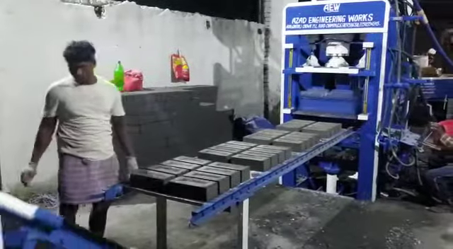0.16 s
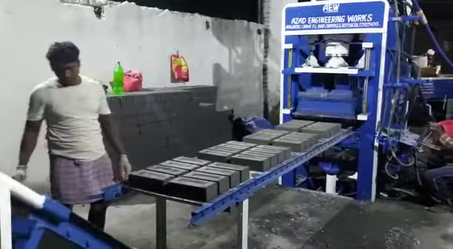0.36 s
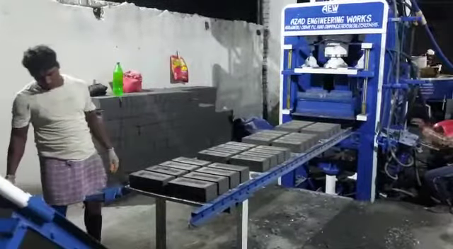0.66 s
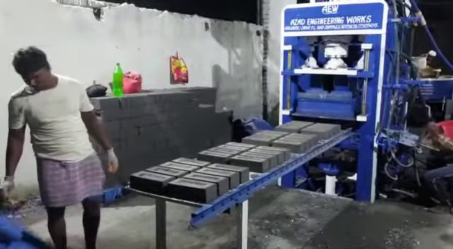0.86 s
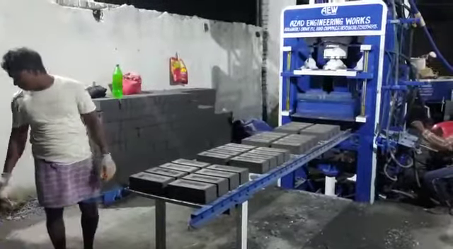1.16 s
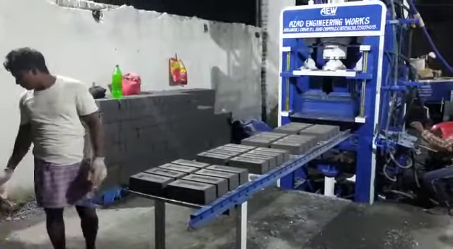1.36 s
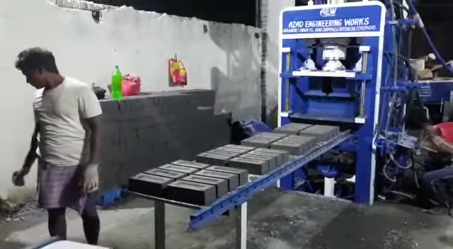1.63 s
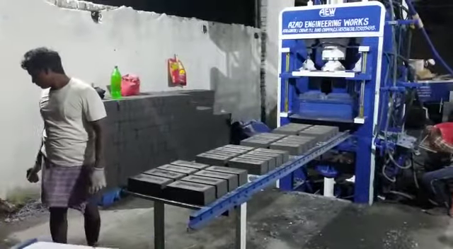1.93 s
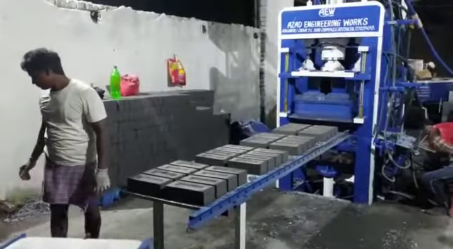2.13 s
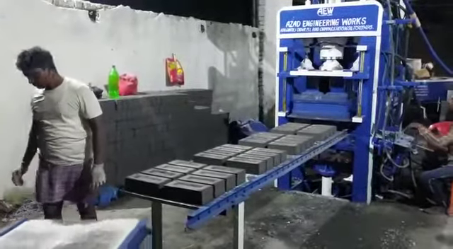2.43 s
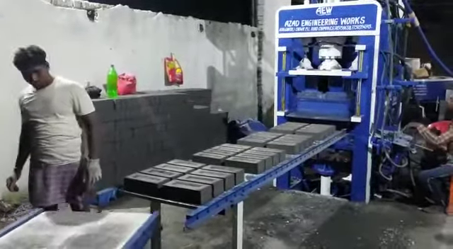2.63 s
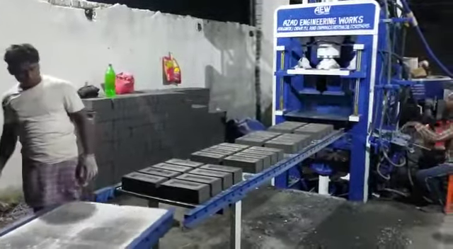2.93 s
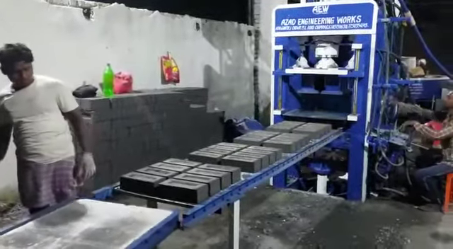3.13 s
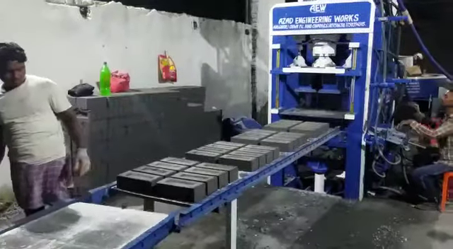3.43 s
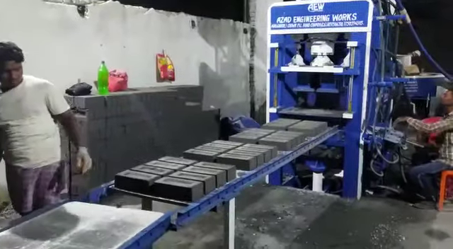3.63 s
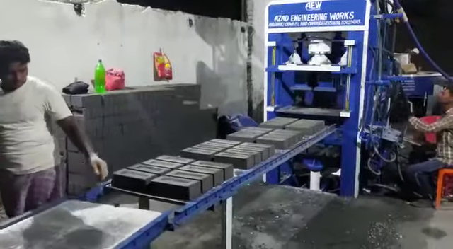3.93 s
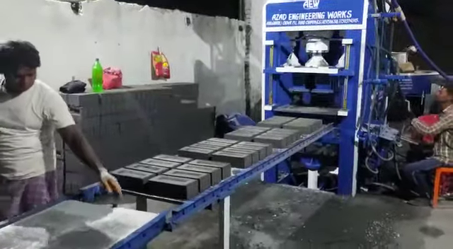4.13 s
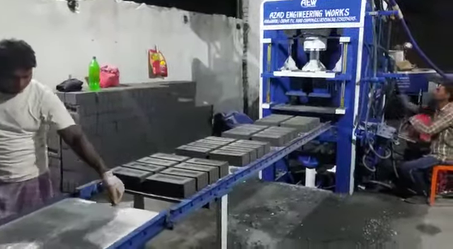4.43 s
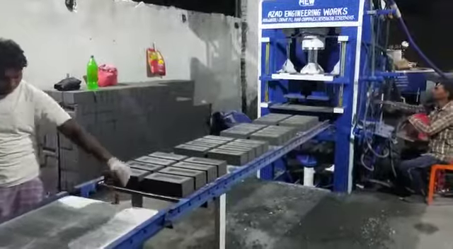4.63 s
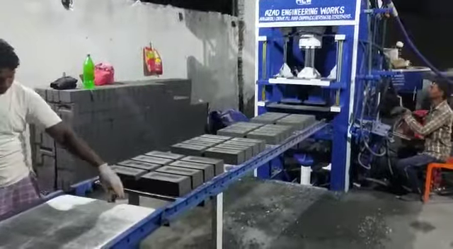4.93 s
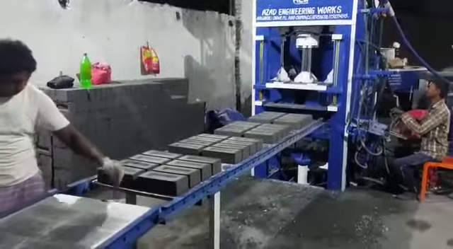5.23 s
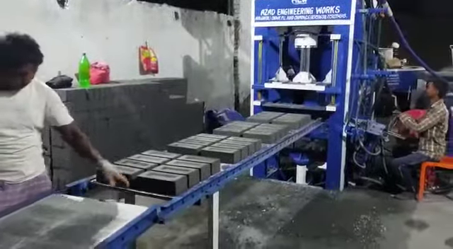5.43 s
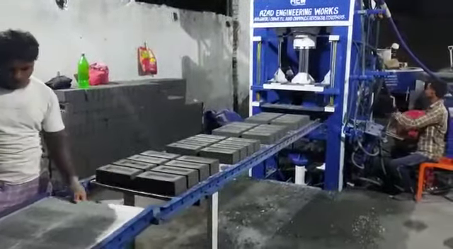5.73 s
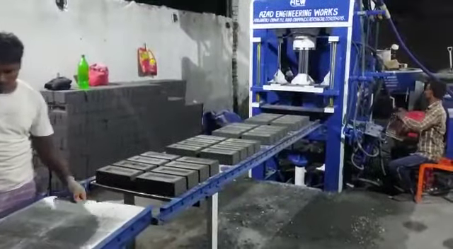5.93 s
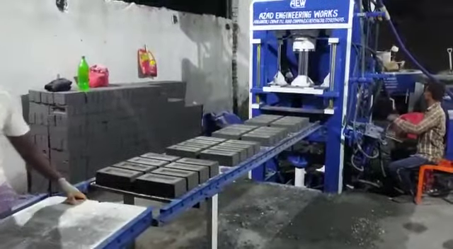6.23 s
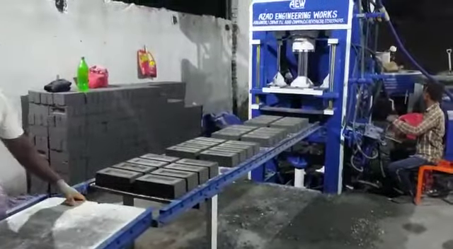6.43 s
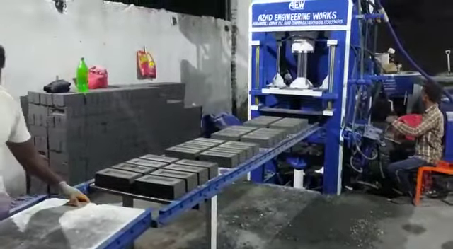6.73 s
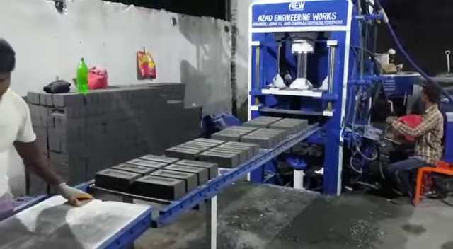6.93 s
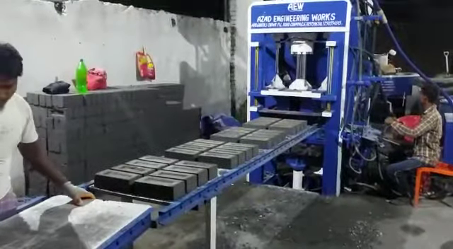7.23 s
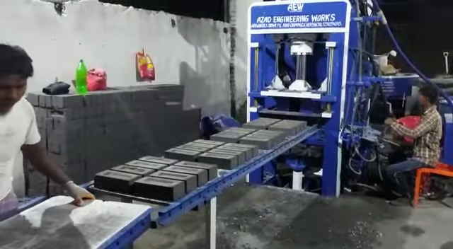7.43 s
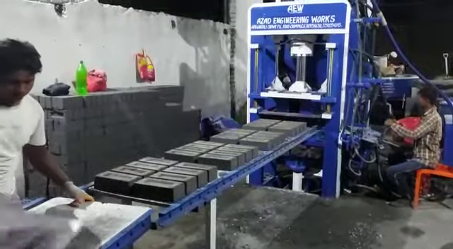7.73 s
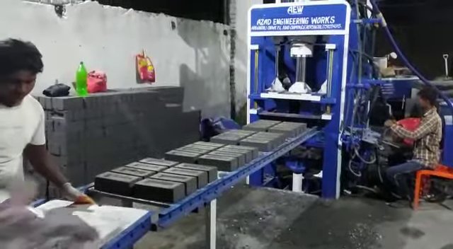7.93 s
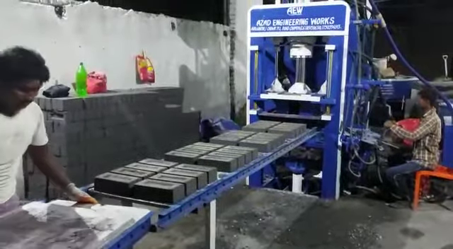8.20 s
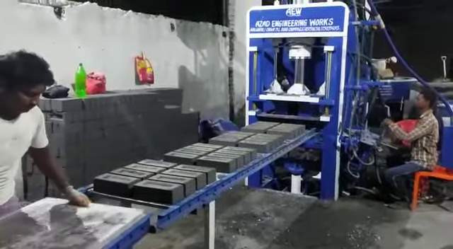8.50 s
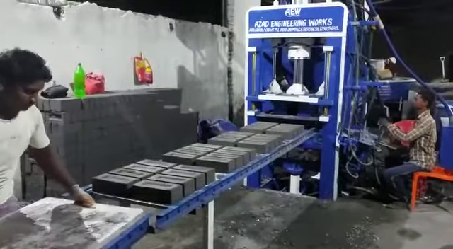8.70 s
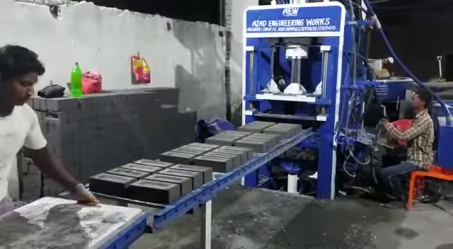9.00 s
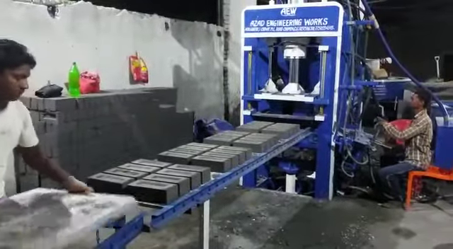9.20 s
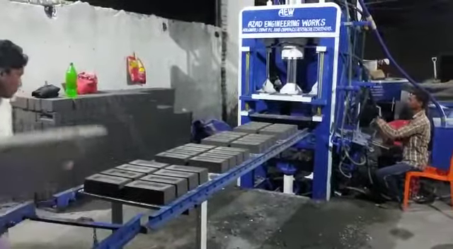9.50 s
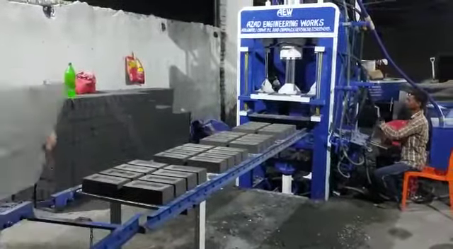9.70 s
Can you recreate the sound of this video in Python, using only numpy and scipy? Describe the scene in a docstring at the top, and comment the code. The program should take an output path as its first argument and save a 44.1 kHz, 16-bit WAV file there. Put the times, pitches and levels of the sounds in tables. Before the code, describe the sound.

Heavy steel slams and rattling over a steady motor hum give way to a rising pump whine, a squeal, a hard clank and pressurised hissing.

```python
"""In a walled yard a hydraulic block press works: its mould box slams and rattles, and the steel frame booms.
Blows are bursts of noise shaped by the steel; squeals are rough, wavering tones from a dry guide.
A pallet is picked up with a click and a squeak. A motor-driven pump hums all along, as a stack of tones
tied to its shaft; it changes note as the ram lifts, then strains and hisses under rising pressure.
The oil is coloured noise that partly repeats with each turn, and the walls add a short echo to the steelwork."""
import sys
import numpy as np
from scipy import signal
from scipy.fft import rfft, irfft, next_fast_len
from scipy.io import wavfile
from scipy.ndimage import uniform_filter1d

SR = 44100
rng = np.random.default_rng(int(sys.argv[2]) if len(sys.argv) > 2 else 0)


def transcribe(signal):
    """Save signal, clipped to [-1, 1], as a 16-bit WAV file at the path in sys.argv[1]."""
    frames = np.atleast_2d(signal).T
    limited = np.clip(frames, -1, 1)
    pcm = np.round(limited * 32767).astype(np.int16)
    wavfile.write(sys.argv[1], SR, pcm)


N = 434826  # length of the scene in samples

# the mould box slams into its stops: t/s, level/dB, brightness/(dB per octave), contact/s
SLAMS = [(.409,-20.5,0,0.045),(.75,-28.5,0,0.028),(1.035,-21,0.4,0.051),(2.305,-21.5,0.5,0.056),(3.67,-19.5,1.1,0.063)]
# steel parts knock together: same columns
KNOCKS = [(1.201,-28.5,0.63,0.032),(2.915,-32,-.6,.02),(2.968,-23,-1.3,0.019),(3.168,-25,-.6,0.017),(3.216,-32,-0.19,.015),(3.37,-29,1.5,0.03),(4.038,-36,1.1,0.04),(4.319,-37.5,.5,0.014),(4.575,-36,0.41,0.0096),(5.196,-24.5,-1.9,0.053),(7.768,-25.5,1.2,0.013),(7.9803,-13.5,1.6,0.0042),(8.535,-38,0.12,0.016)]
# longer, mostly brighter noisy bursts, with a dull bump at the end: same columns
NOISY_BURSTS = [(.696,-34.5,0.7,0.021),(.83,-31,0,0.075),(1.605,-33,-1,0.079),(1.945,-33,-0.7,0.031),(3.127,-34.5,-2.1,0.019),(3.509,-44.5,2,0.11),(5.63,-31.5,-0.5,0.047),(5.878,-38,-1.1,.06),(5.955,-34.5,-1,0.099),(5.995,-27.5,-0.56,0.025),(8.1,-33,1,0.024),(8.585,-40.5,-1.5,0.019),(8.843,-51,3.9,0.059),(9.816,-37.5,-5,0.085)]
# dull, damped thuds of the frame: t/s, level/dB
THUDS = [(1.356,-21),(1.408,-18),(8.066,-20.5)]
THUD_CONTACT_S = 0.026
# each kind of contact: (levels/dB in five bands from thump to sizzle,
# share of the contact spent rising, base t60/s for the treble after a typical contact)
SLAM_KIND = ([-4.5, 5, -2.5, -2, -7.5], 0.074, 0.37)
KNOCK_KIND = ([-13, -2, 0.5, -4.5, -15], 0.1, 0.22)
NOISY_BURST_KIND = ([-11.5, -5.5, -0.5, 1, -1], 0.15, .18)
THUD_KIND = ([-25.5, -4, -32, -29.5, -33], .45, 0.13)
TYPICAL_CONTACT_S = 0.051  # longer contacts ring for longer
# where the five bands meet: f/Hz
BLOW_EDGES_HZ = [130, 350, 1000, 3000]
# the middle of each band: f/Hz
BLOW_CENTRES_HZ = [80, 220, 600, 1700, 5000]
# colour of steel on steel: f/Hz, level/dB per Hz
CLASH = [(20,-28.5),(45,-8.5),(100,-8.5),(300,-7.5),(550,-6),(1000,-11.5),(1400,-12.5),(2000,-21.5),(3000,-19),(4500,-20),(7500,-29)]
# resonances of the press frame: f/Hz, width/Hz, level/dB in a blow, level/dB while it shakes
FRAME_MODES = [(66.4,12,-5,-26),(105.3,2.6,5.5,6),(153.8,12,2.5,5),(203,14,4.5,5),(240.2,8.1,2,6),(269.4,31.6,4.5,-11),(301.5,56,1.5,-5.5),(397,49,-0.5,-10),(493.3,27,-1,-5),(676,120,-6,-24),(970,220,-11,-12.5),(1910,570,-15,-25)]
# runs of the mould box, which shake the frame: t/s, length/s, sway level/dB, boom level/dB
RUNS = [(0,.4,-43,-46),(0.451,0.11,-28,-30),(0.74,0.18,-30,-29.5),(1.052,0.21,-29,-27),(1.513,0.091,-32.5,-32),(2.419,0.32,-35,-31),(2.692,0.98,-57,-32.5),(3.497,0.22,-49,-25.5)]
RUN_RISE_S, RUN_T60_S = 0.058, 1
# colour of the travelling mould box: f/Hz, level/dB per Hz
RUMBLE = [(25,-32.5),(70,1.5),(200,5.5),(450,-7),(900,-9.5),(1400,-6.5),(2000,-6.5),(2800,-17),(7500,-40)]
# dry steel sliding: t/s, f/Hz, level/dB, rise/s, hold/s, t60/s, octave above/dB, waver as a share of f
SQUEALS = [(2.98,1138,-37,0.023,.14,1,-23,.002),(3.371,1143,-34.5,0.012,0.078,0.25,-29,0.0018),(3.373,408,-17.5,0.0081,0.0069,0.014,-36,0.022),(5.24,1982,-9,0.017,0.015,.048,-19,0.014),(5.27,6700,-34,0.0084,0.027,0.07,-40,0.13),(5.276,2226,-29,0.037,0.066,0.47,-37,0.0077),(5.292,2000,-25,0.004,.045,0.053,-34,0.0063),(5.452,2420,-40,0.072,0.11,0.17,-28.5,0.051),(9.254,1268,-26.5,0.0061,0.0062,0.09,-1.5,0.037)]
# light taps on small steel parts: t/s, level/dB, brightness/(dB per octave)
TICKS = [(8.165,-34,4),(9.1594,-21,-1)]
# what those small parts ring with: f/Hz, level/dB, t60/s
FITTING_MODES = [(2074,-5.5,0.014),(2270,-16.5,.02),(2810,1,.02),(3480,-10,0.011),(4020,-6.5,.012),(4500,-13,.012),(5230,-7,.012),(5760,-9.5,.012),(6200,-21,.01)]
CRACK_DB, CRACK_T60_S = -8.5, 0.04
# motor shaft, slowing under each effort: t/s, speed/(turns per second)
SHAFT = [(.38,24.8),(.6,24.05),(.95,25.05),(1.2,24.3),(1.5,24.3),(2.0,24.92),(2.5,24.3),(3.6,24.28),(3.95,24.9),(4.25,24.42),(5.15,24.43),(5.55,24.0),(5.82,25.02),(7.0,24.62),(8.0,24.25),(8.2,24.47),(8.46,24.47),(8.65,24.93)]
# the pump glides from one duty to the next: t/s, duty, effort level/dB
DUTY_STEPS = [(0,"feed",1.5),(3.6,"feed",2.5),(3.95,"idle",-4.5),(4.25,"lift",-.5),(5.151,"lift",1),(5.579,"lift",0.5),(5.779,"idle",-1.5),(5.88,"idle",-3),(6.901,"press",0.5),(7.75,"full",1),(8.001,"full",1.5),(8.2,"relief",0.5),(8.459,"relief",-1),(8.59,"idle",-3),(9.86,"idle",-2.5)]
# names of the six duties; the lists below marked "per duty" follow this order
DUTIES = ["lift", "idle", "press", "full", "relief", "feed"]
# pump tones in each duty: multiples of the shaft rate, then their levels/dB
LIFT_ORDERS = [7, 10, 13, 18, 20, 28, 30, 36, 37, 39, 40, 78, 104, 110]
LIFT_DB = [-47, -38, -50, -64.5, -50, -47.5, -40.5, -53.5, -43, -62.5, -50.5, -65.5, -62, -54]
IDLE_ORDERS = [4, 7, 13, 20, 23, 29, 31, 51, 53]
IDLE_DB = [-57, -53.5, -50, -43, -47, -62, -45, -57, -63]
PRESS_ORDERS = [4, 8, 10, 12, 18, 26, 27, 28, 29, 37, 39, 41, 57, 61, 74, 214]
PRESS_DB = [-48, -31.5, -46.5, -39, -42, -42.5, -48, -45, -36, -45.5, -42.5, -45, -53, -48, -58, -59]
FULL_ORDERS = [7, 8, 10, 14, 16, 18, 19, 20, 26, 29, 31, 39, 53, 56, 72, 80, 94, 131, 234]
FULL_DB = [-41.5, -54, -41, -42, -38, -38.5, -41, -35.5, -36.5, -35, -48.5, -42, -64.5, -37.5, -38.5, -47,
           -43, -48.5, -51]
RELIEF_ORDERS = [7, 8, 18, 19, 26, 29, 35, 39, 42, 58, 80, 125, 213]
RELIEF_DB = [-48.5, -43, -38, -46.5, -43.5, -35.5, -50.5, -47, -54, -43, -48.5, -50, -61]
FEED_ORDERS = [7, 10, 13, 20, 23, 30, 31, 36, 37, 40]
FEED_DB = [-51.5, -43.5, -53, -48, -61, -48.5, -53, -55, -45, -50]
# oil churning and hissing, per duty: level/dB
CHURN_DB = [-39, -40.5, -37, -32.5, -32.5, -40.5]
HISS_DB = [-41.5, -42, -40, -31.5, -34.5, -43]
# power share of the oil noise that repeats with each turn, per duty
LOCKED = [.5, .05, .6, .6, .6, .25]
# colours of the oil noise: f/Hz, level/dB per Hz
CHURN = [(25,-42),(70,-4.5),(130,-3.5),(220,-0.5),(320,-2.5),(450,0.5),(620,-3.5),(900,0),(1080,-7),(1300,-10),(1550,-11),(2000,-4.5),(2800,-33.5),(4000,-19.5),(8000,-41.5)]
HISS_LIFT = [(500,-11.5),(1500,-0.5),(2400,-11),(3200,2),(3700,-0.5),(4800,-1),(5600,-0.5),(6600,0.5),(7500,-9)]
HISS_IDLE = [(500,-18.5),(1400,-5.5),(2100,3),(3000,1.5),(3800,2),(4800,-5),(5400,0),(6500,1),(7500,-1)]
HISS_PRESS = [(400,-31.5),(1100,8),(2000,1),(3100,3.5),(4000,-5),(4300,-0.5),(4950,-6),(5270,3.5),(5460,1),(5730,5.5),(6350,-6.5),(6900,6.5),(7500,-6)]
# resonances of the return line while the ram lifts: f/Hz, width/Hz, level/dB
PIPE_MODES = [(1240,180,12),(1810,140,-3.5),(2626,360,12),(4000,150,7),(4200,170,4),(5570,230,1.5)]
# how alike the two sides are: f/Hz, left-right correlation
ALIKE = [(100,1),(280,0.98),(600,0.95),(1200,0.059),(2500,0.033),(6000,0.0067)]
# echo of the yard: f/Hz, t60/s
YARD_T60 = [(100,0.43),(1000,0.39),(7000,0.21)]
# balance of the sides: f/Hz, left minus right level/dB
LEAN = [(60, -10.5), (100, 1), (180, -0.5), (310, -1), (530, 0.5), (900, -0.5), (1560, -0.5), (2680, -1),
        (4600, -3), (7920, -1.5)]
TOP_HZ = 7800  # upper limit of the sound


def amp(db):
    """Turn decibels into gain."""
    return 10 ** (np.asarray(db) / 20)


def unit(x):
    """Scale to an rms of 1."""
    return x / np.sqrt(np.mean(x ** 2) + 1e-20)


def along(points, hz):
    """Read a value between (f/Hz, value) points on a log frequency axis."""
    f, value = np.transpose(points)
    return np.interp(np.log(hz + 1), np.log(f + 1), value)


def curves(rows):
    """Draw one value per sample for each column after the time."""
    times, *columns = np.transpose(rows)
    return [np.interp(np.arange(N) / SR, times, column) for column in columns]


def wobble(rate):
    """Make a smooth random curve with about `rate` knots a second."""
    knots = rng.standard_normal(int(N * rate / SR) + 4)
    return signal.resample(knots, N)


def filtered(x, response):
    """Multiply the spectrum of x by a response that depends on frequency."""
    n = x.shape[-1]
    padded = next_fast_len(n + SR // 4)
    spectrum = rfft(x, padded) * response(np.fft.rfftfreq(padded, 1 / SR))
    return irfft(spectrum, padded)[..., :n]


def spread(pair):
    """Mix two unrelated signals into left and right: alike in the bass, apart in the treble."""
    def shares(hz):
        turn = np.arccos(np.clip(along(ALIKE, hz), -1, 1)) / 2
        return np.array([np.cos(turn), np.sin(turn)])
    mid, side = filtered(pair, shares)
    return np.array([mid + side, mid - side]) / np.sqrt(np.mean(mid ** 2) + 1e-20)


def rush(response):
    """Make steady coloured stereo noise, about rms 1."""
    return spread(filtered(rng.standard_normal((2, N)), response))


def swell(t, rise, hold, t60):
    """Rise from zero, stay until `hold`, then die away by 60 dB in each t60."""
    onset = np.clip(t / max(rise, 1e-4), 0, 1)
    return onset * np.exp(-np.log(1000) * np.maximum(t - hold, 0) / t60)


def place(out, start_s, sound):
    """Add a short sound to the scene at its start time."""
    start = round(start_s * SR)
    out[:, start:start + sound.shape[1]] += sound


def clanks():
    """All slams, knocks, noisy bursts and thuds, each made of many tiny contacts."""
    out = np.zeros((2, N + SR))
    thuds = [(s, db, 0, THUD_CONTACT_S) for s, db in THUDS]
    kinds = [(SLAM_KIND, SLAMS), (KNOCK_KIND, KNOCKS), (NOISY_BURST_KIND, NOISY_BURSTS), (THUD_KIND, thuds)]
    for kind, rows in kinds:
        for s, db, bright_db, hold in rows:
            place(out, s, clank(kind, db, bright_db, hold))
    return out[:, :N]


def clank(kind, db, bright_db, hold, contacts_per_s=2200, grit=1.38, ring_db=6.5, bass_life=1.27):
    """A burst of tiny contacts and grit noise that rings the frame and the loose plates on it."""
    bands_db, rise_share, t60 = kind
    n = SR * 2 // 3
    t = np.arange(n) / SR
    loose = plates(t[:SR // 6])  # a fresh random plate ring is drawn for each blow
    contacts = rng.standard_normal((2, n)) * (rng.random((2, n)) < contacts_per_s / SR)
    force = unit(contacts) + grit * rng.standard_normal((2, n))
    force = signal.fftconvolve(force, loose, axes=1)[:, :n]

    def steel_colour(hz):
        return np.hypot(amp(along(CLASH, hz)), amp(ring_db) * abs(frame(hz, False)))

    def band_split(hz):
        lows = [1 / (1 + (hz / edge) ** 8) for edge in BLOW_EDGES_HZ]
        below = np.array([0 * hz] + lows + [1 + 0 * hz])
        return np.diff(below, axis=0)[:, None]

    bands = filtered(spread(filtered(force, steel_colour)), band_split)
    octaves = np.log2(np.divide(BLOW_CENTRES_HZ, np.median(BLOW_CENTRES_HZ)))
    levels = db + np.array(bands_db) + bright_db * octaves
    lives = np.geomspace(bass_life, 1, len(levels))  # the bass outlasts the treble
    out = np.zeros((2, n))
    for band, level, life in zip(bands, levels, lives):
        fade_s = t60 * life * np.sqrt(hold / TYPICAL_CONTACT_S)
        shape = swell(t, rise_share * hold, hold, fade_s)
        strength = np.sqrt(np.sum((band.mean(axis=0) * shape) ** 2) / np.sum(shape ** 2))
        out += amp(level) * shape * band / strength
    return out


def plates(t, plate_t60=0.025, plate_db=-7.5):
    """A contact heard directly and through loose plates, whose modes lie too close to tell apart."""
    ring = rng.standard_normal((2, len(t))) * np.exp(-np.log(1000) * t / plate_t60)
    return (t == 0) + amp(plate_db) * ring / np.linalg.norm(ring[0])


def frame(hz, shaking):
    """The steel frame as a sum of resonances with alternating sign, struck or shaking."""
    total = 0
    for k, (centre, width, blow_db, shake_db) in enumerate(FRAME_MODES):
        damping = 1j * hz * width
        level = amp(shake_db if shaking else blow_db)
        total = total + (-1) ** k * level * damping / (centre * centre - hz * hz + damping)
    return total


def boom(lumpy_db=0.5, split_hz=135, rumble_db=-38.5, rumble_t60=.3):
    """The mould box rumbles and its runs shake the frame: the lowest modes sway, the higher ones boom."""
    t = np.arange(N) / SR
    starts, lengths, sway_db, boom_db = np.transpose(RUNS)
    runs = np.array([swell(t - s, RUN_RISE_S, length, RUN_T60_S) for s, length in zip(starts, lengths)])

    def lowest(hz):
        return 1 / (1 + (hz / split_hz) ** 12)

    def higher(hz):
        return (1 - lowest(hz)) / (1 + (hz / 1100) ** 2)

    # overlapping runs add up in power
    sway = rush(lambda hz: frame(hz, True) * lowest(hz)) * np.sqrt(amp(sway_db) ** 2 @ runs ** 2)
    body = rush(lambda hz: frame(hz, True) * higher(hz)) * np.sqrt(amp(boom_db) ** 2 @ runs ** 2)
    travel = swell(t, 0, starts[-1] + lengths[-1], rumble_t60)  # until the last run ends
    rumble = rush(lambda hz: amp(along(RUMBLE, hz))) * amp(rumble_db) * travel
    return (sway + body + rumble) * amp(lumpy_db * wobble(14))


def squeals(rough_db=3.5, ear_phase=0.4):
    """Stick and slip holds one steel mode singing with a rasping pitch.

    The octave above it is weak in most squeals and nearly as strong in the last."""
    t = np.arange(SR // 2) / SR
    out = np.zeros((2, N + len(t)))

    def jitter(count):
        return unit(signal.resample(rng.standard_normal(count), len(t)))

    ears = np.array([[-ear_phase], [ear_phase]])  # radians
    for s, hz, db, rise, hold, t60, octave_db, waver in SQUEALS:
        pitch = hz * (1 + waver * jitter(240))
        phase = 2 * np.pi * np.cumsum(pitch) / SR + ears
        tone = np.sin(phase) + amp(octave_db) * np.sin(2 * phase)
        grip = amp(rough_db * jitter(110))
        place(out, s, np.sqrt(2) * amp(db) * swell(t, rise, rise + hold, t60) * tone * grip)
    return out[:, :N]


def ticks():
    """Each tap is a dry crack that rings the small parts briefly, at new strengths."""
    t = np.arange(SR // 8) / SR
    out = np.zeros((2, N + len(t)))
    for s, db, bright_db in TICKS:
        noise = rng.standard_normal((2, len(t)))
        crack = unit(filtered(noise, lambda hz: (hz > FITTING_MODES[0][0]) & (hz < TOP_HZ)))
        tap = amp(CRACK_DB) * crack * swell(t, .0005, 0.0038, CRACK_T60_S)
        for hz, mode_db, t60 in FITTING_MODES:
            chance_db = 2 * rng.standard_normal((2, 1))
            level = amp(mode_db + bright_db * np.log2(hz / 3500) + chance_db)
            ring = np.sin(2 * np.pi * (hz * t + rng.random((2, 1))))
            tap += level * ring * swell(t, .001, 0.0037, t60)
        place(out, s, amp(db) * tap)
    return out[:, :N]


def duty_shares():
    """How much of each duty the pump is doing, and its effort in dB."""
    rows = [(s, *[duty == name for name in DUTIES], db) for s, duty, db in DUTY_STEPS]
    *shares, effort_db = curves(rows)
    return np.array(shares), effort_db


def pump(angle, shares, flutter_db=2.3, scatter=1.33):
    """Every pump tone is locked to the shaft; the duty decides which ones stand out."""
    out = np.zeros((2, N))
    coarse = np.arange(0, N, SR // 100)  # levels are worked out 100 times a second
    tables = [(LIFT_ORDERS, LIFT_DB), (IDLE_ORDERS, IDLE_DB), (PRESS_ORDERS, PRESS_DB),
              (FULL_ORDERS, FULL_DB), (RELIEF_ORDERS, RELIEF_DB), (FEED_ORDERS, FEED_DB)]
    duties = [dict(zip(orders, amp(levels_db))) for orders, levels_db in tables]
    for k in sorted(set().union(*duties)):
        strength = np.array([tones.get(k, 0) for tones in duties]) @ shares[:, coarse]
        drift = unit(uniform_filter1d(rng.standard_normal(len(coarse)), size=14))
        gain = np.interp(np.arange(N), coarse, strength * amp(flutter_db * drift))
        # neighbouring multiples beat once a turn
        phase = (k * angle + scatter * rng.standard_normal()).astype(np.float32)
        # the walls shift the phase between the ears
        alike = np.clip(along(ALIKE, k * SHAFT[0][1]), -1, 1)
        apart = np.float32(np.arccos(alike) / 3)
        out += gain * np.sin([phase - apart, phase + apart])
    return out * np.sqrt(2)


def oil(angle, shares, throb=0.06, chop=0.019, whine_hz=900):
    """Oil churns in the pump and hisses through the open valve; the duty sets how much repeats each turn."""
    lift, idle, press, full, relief, feed = shares
    locked = np.dot(LOCKED, shares)

    def flow():
        whine = filtered(per_turn(angle), lambda hz: 1 - 1 / (1 + (hz / whine_hz) ** 8))
        return np.sqrt(locked) * whine + np.sqrt(1 - locked) * rng.standard_normal((2, N))

    def colour(source, points, modes=()):
        def response(hz):
            peaks = sum(amp(db) / (1 + (2 * (hz - centre) / width) ** 2) for centre, width, db in modes)
            return np.hypot(amp(along(points, hz)), peaks)
        return spread(filtered(source, response))

    beat = np.cos(angle)  # once a turn
    churn = colour(flow(), CHURN) * amp(np.dot(CHURN_DB, shares)) * (1 + throb * beat)
    jet = flow()
    hiss = colour(jet, HISS_LIFT, PIPE_MODES) * np.sqrt(lift)
    hiss += colour(jet, HISS_IDLE) * np.sqrt(idle + feed)
    hiss += colour(jet, HISS_PRESS) * np.sqrt(press + full + relief)
    return churn + hiss * amp(np.dot(HISS_DB, shares)) * (1 + chop * beat)


def per_turn(angle, size=1024):
    """Stereo noise that repeats with every shaft turn: a dense stack of thin lines of uneven strength."""
    lines = rfft(rng.standard_normal((2, size)), axis=1)
    lines = lines * amp(3.5 * np.clip(rng.standard_normal(lines.shape[1]), -2, 1.5))
    pattern = unit(irfft(lines, 8 * size, axis=1))  # eight times finer, for smooth reading
    position = (angle / (2 * np.pi) % 1) * pattern.shape[1]
    turning = pattern[:, position.astype(int) % pattern.shape[1]]
    return turning * np.sqrt(size * SHAFT[0][1] / SR)


def yard(x):
    """The walls answer with a short noise tail that loses its treble first."""
    hz, t, z = signal.stft(rng.standard_normal((2, SR // 2)), SR, nperseg=256)
    fade = np.exp(-np.log(1000) * t / along(YARD_T60, hz)[:, None])
    tail = spread(signal.istft(z * fade, SR, nperseg=256)[1])
    return signal.fftconvolve(x, tail / np.linalg.norm(tail[0]), axes=1)[:, :N]


def scene():
    """Steelwork, pump and oil in the yard; only the blows and small sounds are sent to the echo."""
    blows, small = clanks(), squeals() + ticks()
    speed, = curves(SHAFT)
    angle = 2 * np.pi * np.cumsum(speed) / SR
    shares, effort_db = duty_shares()
    hydraulics = amp(effort_db) * (pump(angle, shares) + oil(angle, shares))
    echo = yard(amp(-9.0) * blows + amp(-7.5) * small)
    return blows + small + boom() + hydraulics + echo


def record(dry):
    """The press stands to the right, so that side leads; high peaks are rounded and the band is narrow."""
    lead_s = 1e-4

    def sides(hz):
        left_over_right = amp(along(LEAN, hz)) * np.exp(-2j * np.pi * hz * lead_s)
        return left_over_right ** np.array([[.5], [-.5]])  # half to each side

    heard = filtered(dry, sides)
    heard = heard / (1 + abs(heard / .95) ** 6) ** (1 / 6)
    return filtered(heard, lambda hz: 1 / np.sqrt(1 + (hz / TOP_HZ) ** 120))


dry = scene()
out = record(dry)
transcribe(out)
```